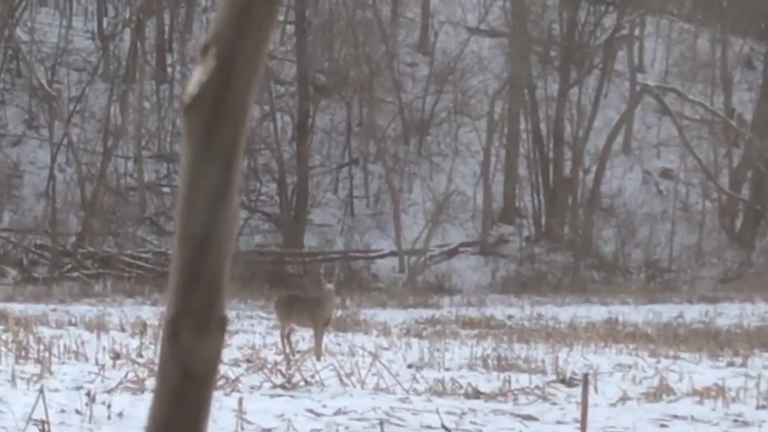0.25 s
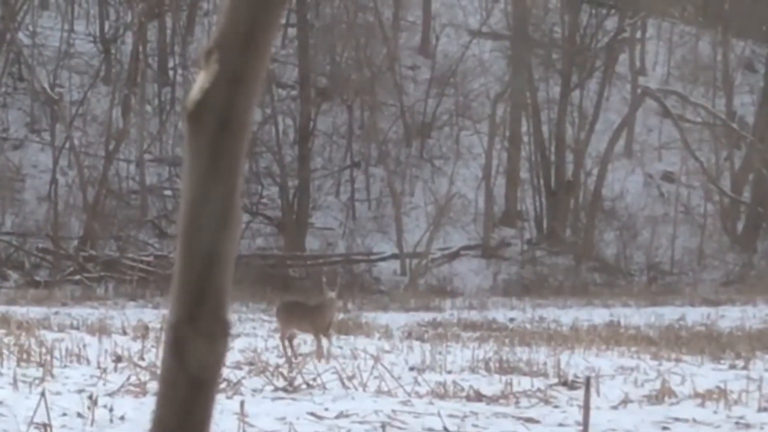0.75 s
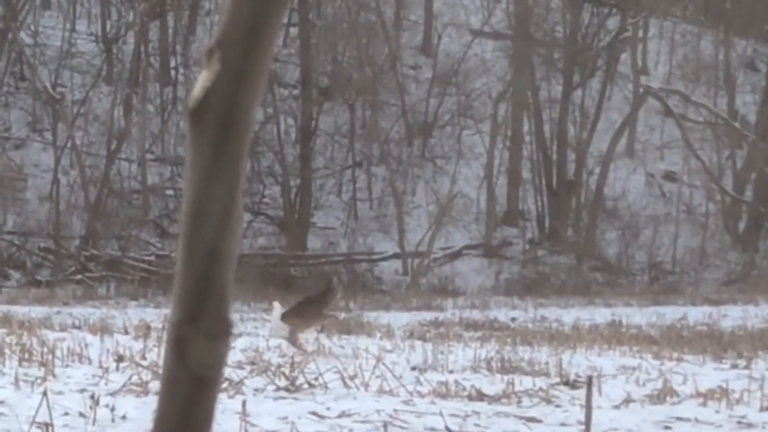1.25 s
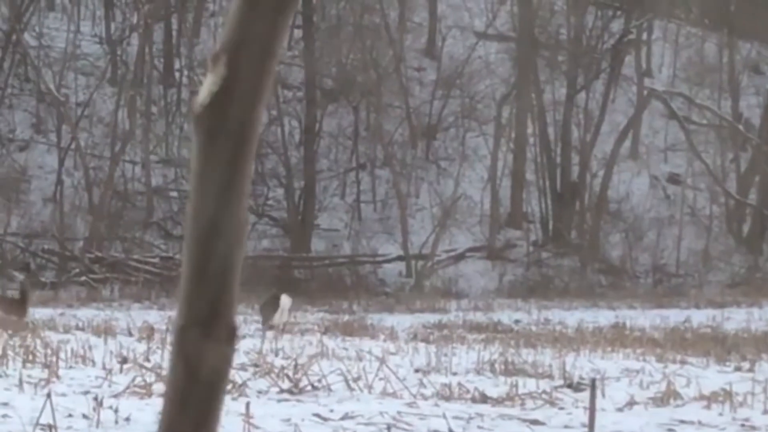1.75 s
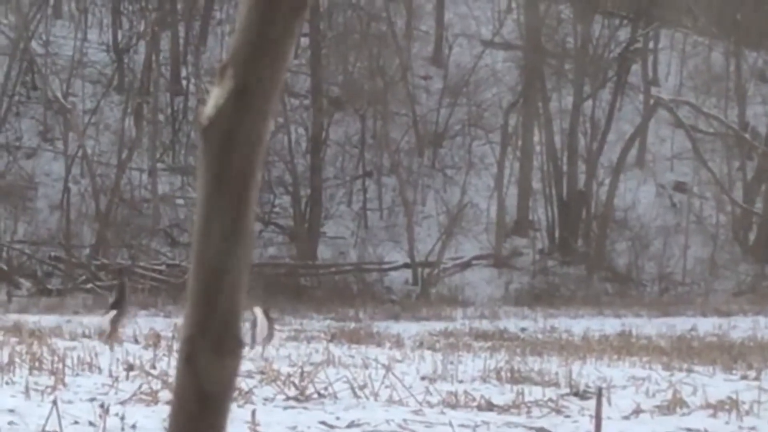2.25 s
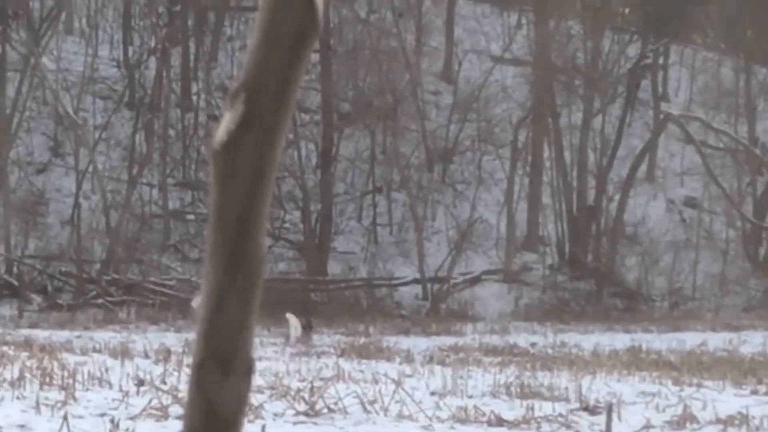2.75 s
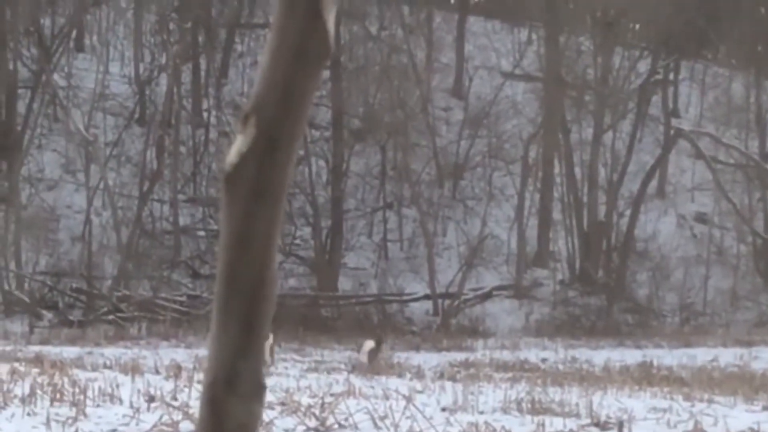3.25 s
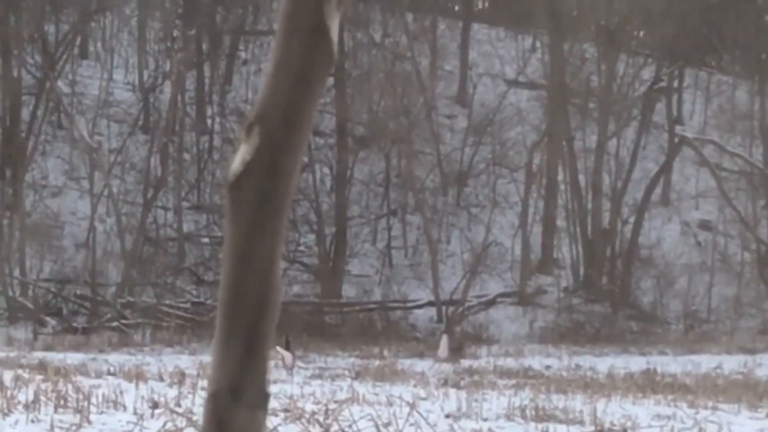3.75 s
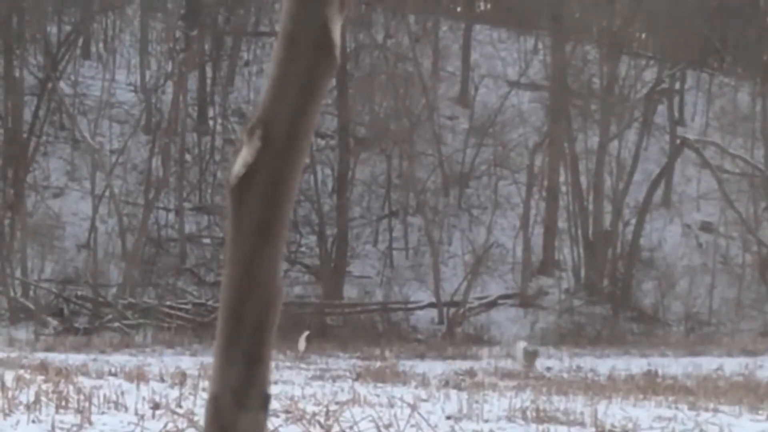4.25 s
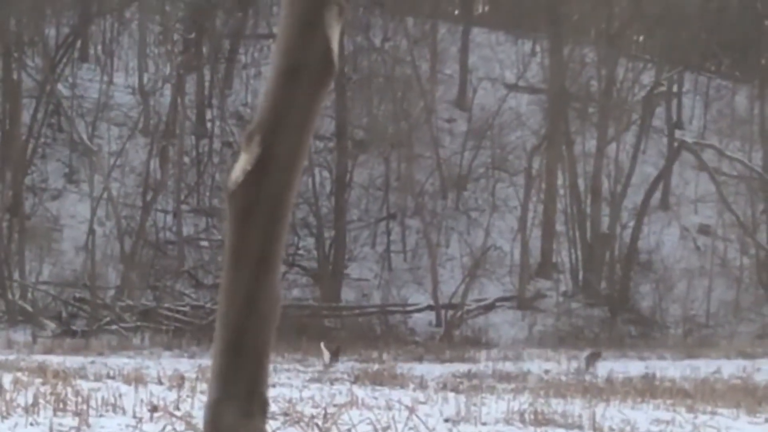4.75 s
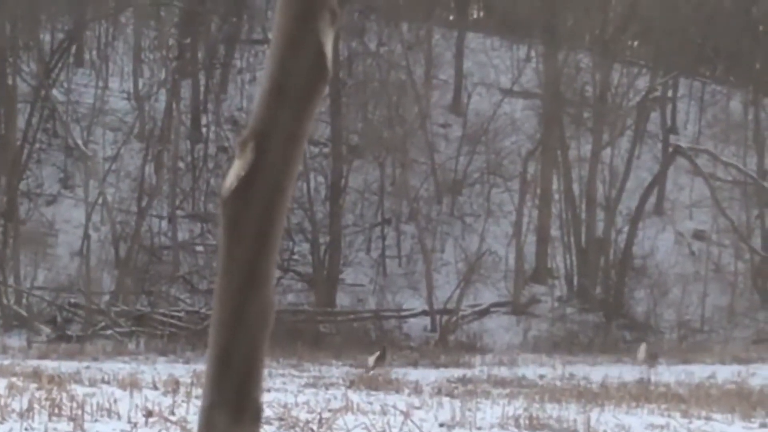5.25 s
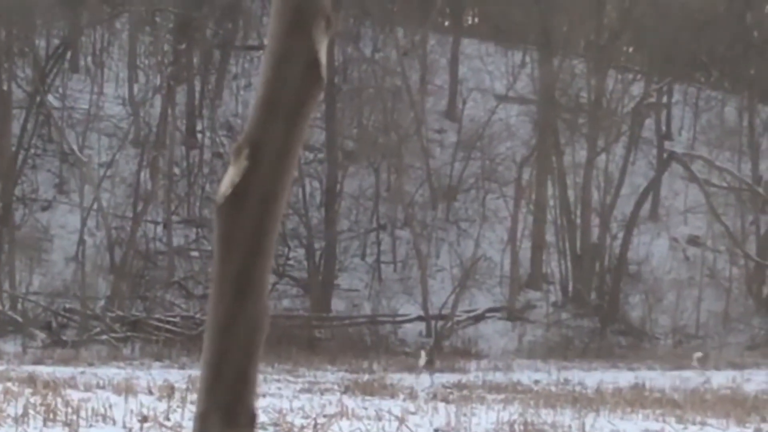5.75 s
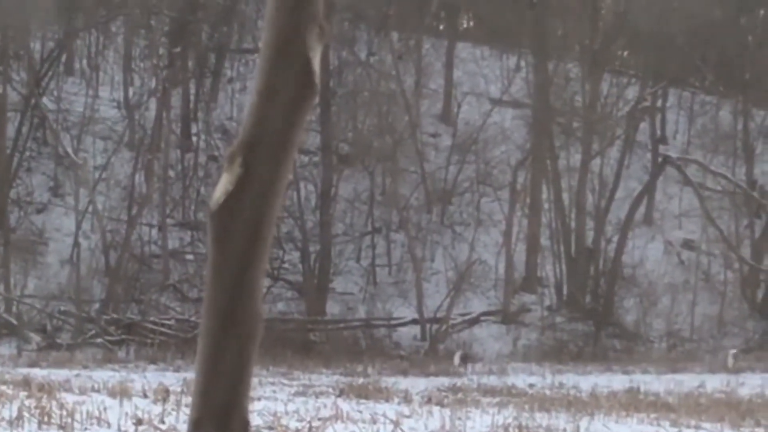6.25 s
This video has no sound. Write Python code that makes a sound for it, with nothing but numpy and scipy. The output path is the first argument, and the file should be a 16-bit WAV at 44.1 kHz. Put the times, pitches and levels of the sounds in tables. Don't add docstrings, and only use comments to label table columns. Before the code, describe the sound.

A crossbow fires very close with one violent, sharp metallic snap, then a small distant thud, faint cloth rustling, tiny ticks and low wind.

```python
import sys
import numpy as np
from scipy import signal
from scipy.fft import rfft, irfft, next_fast_len
from scipy.io import wavfile
from scipy.ndimage import map_coordinates

SR = 44100
rng = np.random.default_rng(int(sys.argv[2]) if len(sys.argv) > 2 else 0)


def master_out(mix):
    frames = np.transpose(np.atleast_2d(mix))
    ceiling = np.clip(frames, -1, 1)
    pcm = np.round(ceiling * 32767).astype(np.int16)
    wavfile.write(sys.argv[1], SR, pcm)


def natural_amplitude(level_db):
    exponent = np.asarray(level_db, float) / 20
    return 10 ** exponent


N = 287111


def unit(x):
    return x / np.sqrt(np.mean(x ** 2) + 1e-20)


def curves(rows):
    s, *cols = np.transpose(rows)
    return [np.interp(np.arange(N) / SR, s, c) for c in cols]


def wobble(rate, size=N):
    knots = rng.standard_normal(int(size * rate / SR) + 4)
    return map_coordinates(knots, [np.arange(size) * rate / SR])


def coloured(x, spectrum):
    size = next_fast_len(len(x) + 8192)
    hz, db = np.transpose(spectrum)
    bins_hz = np.fft.rfftfreq(size, 1 / SR)
    gain = natural_amplitude(np.interp(np.log(bins_hz + 1), np.log(hz + 1), db))
    return unit(irfft(rfft(x, size) * gain, size)[:len(x)])


def gritty(size, grit_db):
    return rng.standard_normal(size) * natural_amplitude(grit_db * rng.standard_normal(size))


def add(track, s, sound):
    part = track[round(s * SR):][:len(sound)]
    part += sound[:len(part)]


def burst(stage, spectrum, grit_db, chatter_db):
    s, db, rise, hold, t60 = stage
    out, t = np.zeros(N), np.arange(SR // 4) / SR
    decay_db = -60 * np.maximum(t - rise - hold, 0) / t60
    shape = np.clip(t / rise, 0, 1) ** 2 * natural_amplitude(db + decay_db)
    chatter = natural_amplitude(chatter_db * wobble(900, size=len(t)))
    add(out, s, shape * unit(chatter * coloured(gritty(len(t), grit_db), spectrum)))
    return out


def rings(rows, phase, attack):
    out, t = np.zeros(N), np.arange(SR // 5) / SR
    for s, db, hz, t60 in rows:
        tone = np.sin(2 * np.pi * hz * t + phase)
        add(out, s, natural_amplitude(db - 60 * t / t60) * tone * (1 - np.exp(-t / attack)))
    return out


def jolts(rows):
    lead_s, makeup_db = .0006, 7.5
    parts = [(s - lead_s, db + makeup_db, hz, .013 + 5 / hz) for s, db, hz in rows]
    return rings(parts, phase=0, attack=.0012)


def swells(rows, floor_db):
    edge_db, squareness = 9, 2.2
    t = np.arange(0, N / SR + .002, .001)
    power = sum(natural_amplitude(db - edge_db * np.abs((t - s) / half) ** squareness) ** 2 for s, half, db in rows)
    return 10 * np.log10(np.interp(np.arange(N) / SR, t, power) + natural_amplitude(floor_db) ** 2)


# start in seconds, level in dB, rise, hold and t60 in seconds.
TRIGGER = [
    (.412, -53, .006, .008, .02),
    (.4243, -45, .001, .013, .02),
]
# frequency in Hz, level in dB per Hz.
TRIGGER_TONE = [(120, -41), (200, -11), (1620, -7), (2250, -17), (2960, -1), (3820, -12), (15500, -16)]


def trigger():
    return sum(burst(stage, TRIGGER_TONE, grit_db=5, chatter_db=2.5) for stage in TRIGGER)


# start in seconds, level in dB, rise, hold and t60 in seconds.
RELEASE = (.4368, -11, .0025, .0078, .012)
SLAM = (.4476, -12.6, .002, .0185, .02)
SHUDDER = (.466, -18, .004, .002, .085)
# frequency in Hz, level in dB per Hz.
RELEASE_TONE = [(210, -37), (350, -7), (611, -10), (1400, -4), (2300, -11), (3310, 0), (4780, -5),
                (6070, -1), (7590, -10), (8620, -6), (11900, -8), (13500, -4), (15800, -13)]
SLAM_TONE = [(240, -39), (400, -6), (1230, -4), (1520, -5), (1810, 1), (2070, -7), (3140, -4), (3610, -6),
             (6090, -9), (6570, -6), (7670, -11), (9220, -9), (15800, -11)]
SHUDDER_TONE = [(180, -28), (300, 2), (643, -8), (785, 0), (911, -14), (1310, -3), (1770, -13), (1920, -6),
                (5940, -10), (6450, -2), (7370, -13), (15800, -13)]
# start in seconds, peak in dB, frequency in Hz, t60 in seconds.
KICKS = [
    (.4415, -11.5, 215, .045),
    (.4405, -26, 92, .08),
    (.452, -16, 168, .07),
    (.466, -37, 66, .12),
]
# time in seconds, peak in dB, frequency in Hz.
BOW_JOLTS = [(.4384, -12, 5470), (.439, -14, 8350), (.439, -12, 6200), (.4385, -16, 1100),
             (.4404, -11, 4130), (.4408, -6.5, 3360), (.4428, -15, 1330), (.4439, -15, 10080),
             (.4443, -7.5, 5990), (.4459, -16, 9130), (.4471, -14, 3870), (.4497, -12, 1160),
             (.4502, -14, 6500), (.4509, -9, 2930), (.4537, -17, 5770), (.4555, -13, 860),
             (.4557, -16, 4520), (.4571, -14, 9090), (.4575, -15, 5210), (.4577, -11, 2930),
             (.4585, -14, 1500), (.4589, -15, 6630), (.4604, -9, 1810), (.4616, -12, 2670),
             (.4618, -12, 3270), (.4636, -15, 690), (.4647, -16, 4440), (.4647, -14, 3100),
             (.4662, -15, 9170), (.4678, -14, 2330), (.4713, -22, 9170), (.4684, -17, 4480),
             (.4733, -22, 820), (.4738, -23, 2840), (.4747, -22, 6550), (.4753, -22, 4480),
             (.4778, -26, 1510), (.48, -24, 6590), (.4887, -31, 1290), (.4889, -30, 4480),
             (.4934, -32, 2710)]


def shot():
    out = burst(RELEASE, RELEASE_TONE, grit_db=3, chatter_db=1.1)
    out += burst(SLAM, SLAM_TONE, grit_db=3, chatter_db=1.8)
    out += burst(SHUDDER, SHUDDER_TONE, grit_db=2.5, chatter_db=1.5)
    return out + rings(KICKS, phase=3.6, attack=.003) + jolts(BOW_JOLTS)


# frequency in Hz, level in dB, t60 in seconds.
LIMBS = [(208, -48, .25), (246, -52, .7), (372, -41, .16), (515, -36, .14), (735, -40, .1),
         (1295, -37, .16), (1783, -51, .6), (2243, -49, .25), (2860, -43, .27), (4340, -44, .1),
         (4504, -30, .13), (6562, -30, .085), (9243, -45, .11), (10110, -50, .1)]
# frequency in Hz, level in dB, t60 in seconds.
RAIL = [
    (926, -50, .27),
    (3515, -56, .27),
    (3725, -52, .21),
    (5319, -48, .14),
    (5825, -58, .28),
    (6885, -46, .11),
]


def bow_ring():
    out, t = np.zeros(N), np.arange(SR // 2) / SR
    ring = np.zeros(len(t))
    for hz, db, t60 in LIMBS + RAIL:
        wander = .55 * wobble(55, size=len(t))
        ring += natural_amplitude(db - 60 * t / t60) * np.sin(2 * np.pi * hz * t + wander)
    add(out, .468, natural_amplitude(1.5) * ring * (1 - np.exp(-t / .002)))
    return out


# start in seconds, level in dB, rise, hold and t60 in seconds.
FIELD = (.47, -46.5, .01, .03, .3)
# frequency in Hz, level in dB per Hz.
FIELD_TONE = [(180, -40), (300, -10), (1520, -11), (1770, -1), (2050, -11), (2910, -7), (3320, -17),
              (4410, -12), (7490, -21), (15800, -18)]


def field():
    return burst(FIELD, FIELD_TONE, grit_db=.1, chatter_db=.6)


# start in seconds, level in dB, rise, hold and t60 in seconds.
STALK = [
    (.6668, -42, .001, .0055, .016),
    (.673, -50, .002, .013, .04),
]
# frequency in Hz, level in dB per Hz.
STALK_TONE = [(380, -42), (650, -14), (1250, -8), (1570, -12), (1890, -3), (2750, -12), (3140, -5),
              (5880, -2), (7090, -11), (9770, -6), (12800, -12), (14800, -9), (15800, -17)]
# time in seconds, peak in dB, frequency in Hz.
SPLINTERS = [(.6684, -42, 6030), (.669, -40, 4910), (.6699, -44, 14400), (.6702, -41, 9690),
             (.6704, -44, 3960), (.6711, -45, 11930), (.6719, -44, 3190), (.6731, -42, 5940),
             (.6788, -48, 1850), (.6829, -51, 5770)]


def stalk():
    return sum(burst(stage, STALK_TONE, grit_db=4, chatter_db=2.4) for stage in STALK) + jolts(SPLINTERS)


# start in seconds, level in dB, rise, hold and t60 in seconds.
STRIKE = [
    (.8912, -36.5, .0005, .0015, .008),
    (.893, -51, .001, .004, .11),
]
# frequency in Hz, level in dB per Hz.
STRIKE_TONE = [(290, -48), (500, -18), (1060, 0), (1840, -6), (2670, -20), (3180, -4), (3830, -2),
               (4500, -4), (5050, -14), (7350, -8), (10700, -19), (14500, -17), (15800, -22)]
# start in seconds, peak in dB, frequency in Hz, t60 in seconds.
LANDING = [(.8897, -36, 8300, .004), (.8912, -25, 6900, .005), (.8919, -22.5, 3800, .005),
           (.8926, -38, 2300, .012), (.892, -35, 1200, .012), (.8918, -30, 4500, .006),
           (.8914, -31, 6050, .009), (.891, -38, 13700, .004), (.8912, -40, 11900, .004),
           (.8912, -40, 14800, .004), (.8925, -43, 1800, .02), (.8945, -41, 190, .04)]
# start in seconds, peak in dB, frequency in Hz, t60 in seconds.
THUDS = [
    (.8935, -31, 106, .075),
    (1.0595, -43, 160, .05),
    (1.1325, -42, 115, .09),
    (1.438, -46, 120, .05),
    (5.158, -42, 130, .05),
]


def landing():
    crack = sum(burst(stage, STRIKE_TONE, grit_db=1.5, chatter_db=.8) for stage in STRIKE)
    return crack + rings(LANDING, phase=0, attack=.0004) + rings(THUDS[:1], phase=2.3, attack=.002)


# time in seconds, peak in dB, frequency in Hz.
TICKS = [(.3532, -46, 1940), (1.1194, -45, 7150), (1.4402, -41, 3570), (1.8082, -34, 3500),
         (1.8102, -40, 2600), (1.812, -44, 3000), (1.9363, -44, 6030), (2.0134, -43, 1890),
         (2.0791, -41, 4130), (2.295, -42, 4130), (2.3355, -41, 2800), (2.3591, -35.5, 4220),
         (2.406, -36.5, 3790), (2.4626, -42, 4820), (2.5087, -43, 4820), (2.9124, -39, 3570),
         (2.9815, -44, 3830), (3.1726, -46, 4260), (3.2041, -44, 3570), (3.2328, -43, 5080),
         (3.4524, -36, 5430), (3.5951, -46, 5120), (3.6984, -45, 4130), (3.847, -41, 5430),
         (3.8596, -40, 5300), (3.9305, -42, 2150), (4.0975, -46, 4480), (4.469, -42, 4950),
         (4.7818, -45, 5080), (5.4371, -44, 5080), (5.4498, -44, 5900), (6.3601, -44, 6460)]
# time in seconds, peak in dB.
SEAM = [(1.9007, -46), (2.3138, -40), (2.3798, -40), (2.7238, -39), (3.3444, -45), (3.5712, -43),
        (3.6754, -38), (3.7736, -45), (4.845, -47), (4.94, -47), (5.4636, -45), (6.315, -42)]
# time in seconds, peak in dB, frequency in Hz.
MORE_SNAPS = [(0.9544, -48, 3760), (1.7644, -52, 3600), (1.9504, -47, 3170), (1.9764, -49, 4120),
              (2.0507, -45, 4330), (2.1004, -46, 5070), (2.1124, -47, 5040), (2.2792, -42, 3790),
              (2.4244, -46, 3880), (2.5384, -44, 4630), (2.5494, -43, 4690), (2.5814, -45, 4700),
              (2.6144, -45, 5830), (2.6813, -47, 5200), (2.7072, -40, 6260), (2.7586, -45, 3650),
              (2.8833, -43, 4530), (3.0304, -50, 4710), (3.4584, -49, 3130), (3.5524, -43, 4430),
              (3.6184, -49, 3820), (3.6654, -42, 6330), (3.8112, -48, 5250), (3.8945, -48, 5000),
              (3.918, -43, 6180), (4.2804, -47, 3440), (4.3116, -48, 5260), (4.5814, -49, 3840),
              (4.6784, -49, 4380), (4.7544, -50, 5560), (4.7735, -45, 5310), (5.0539, -44, 3030),
              (5.1487, -50, 5350), (5.9834, -47, 9590), (5.9914, -47, 5530), (6.0084, -48, 12400),
              (6.0282, -46, 4100), (6.106, -45, 11000), (6.1324, -49, 5870), (6.1873, -46, 9340),
              (6.2504, -48, 11300), (6.2684, -49, 11800), (6.3794, -47, 6360), (6.4154, -52, 5720),
              (6.4484, -48, 6160)]


def ticks():
    out, t = np.zeros(N), np.arange(1024) / SR
    seam_hz = 12200
    snaps = TICKS + [(s, db, seam_hz) for s, db in SEAM] + list(MORE_SNAPS)
    for s, db, hz in snaps:
        t60 = max(.0034 + .00045 * (db + 43), .0018)
        bump = [(hz / 1.5, 0), (hz, 2.5), (hz * 1.25, 0)]
        treble_db = 6 * np.log2(hz / 4000) - 5
        slope = [(300, -24), (1200, -5), (3000, 0), (11000, treble_db)]
        spike = natural_amplitude(-60 * t / (1.2 * t60))
        after_crackle = natural_amplitude(-22 - 60 * t / .03)
        shape = (1 - np.exp(-t / .00015)) * (spike + after_crackle)
        snap = shape * coloured(coloured(rng.standard_normal(len(t)), bump), slope)
        add(out, s, natural_amplitude(db + .6) * snap / np.abs(snap).max())
    return out


# start in seconds, peak in dB, frequency in Hz, t60 in seconds.
CREAKS = [(2.0128, -44, 1700, .018), (3.481, -49, 3200, .025), (4.205, -60, 1980, .05),
          (5.227, -54, 1320, .035), (1.135, -55, 5600, .012), (1.268, -55, 900, .015),
          (3.918, -54, 5500, .012), (4.03, -62, 2100, .04), (5.342, -52, 4250, .015)]


def creaks_and_knocks():
    return rings(CREAKS, phase=0, attack=.002) + rings(THUDS[1:], phase=.3, attack=.003)


def crackle():
    per_s, level_db, spread_db, t60 = 85, 7, 2, .002
    t = np.arange(128) / SR
    chance = rng.random((int(per_s * N / SR), 4))
    when, size, octave, phase = chance.T[..., None]
    carrier = np.sin(2 * np.pi * (3000 * 2 ** (2.2 * octave) * t + phase))
    spikes = (carrier + .6 * rng.standard_normal(carrier.shape)) * natural_amplitude(-60 * t / t60)
    spikes = spikes * natural_amplitude(level_db - spread_db * np.log(size + .01))
    where = (when * N).astype(int) + np.arange(len(t))
    return np.bincount(where.ravel(), spikes.ravel(), N + len(t))[:N]


# frequency in Hz, level in dB per Hz.
CLOTH = [(180, -31), (300, -1), (759, -5), (1740, -5), (2820, -7), (4480, -6), (4950, -7), (5470, -6),
         (7620, -10), (9450, -9), (10400, -12), (12500, -9), (15000, -13), (15800, -16)]
# frequency in Hz,
# gain in dB.
PORT = [(7000, .5), (7800, -1.5), (8800, 1), (9800, 1), (10500, -1.2), (11400, 1.2), (14500, 1.2),
        (15800, 3)]
# time in seconds, pressure in dB.
CONTACT = [(0, -77), (.42, -76), (.62, -66), (.72, -64), (.92, -66), (1.03, -72), (1.2, -75), (1.72, -74),
           (2.2, -71), (2.4, -65), (2.85, -64), (3.03, -71), (3.75, -72), (4.0, -76), (4.2, -72),
           (5.62, -75), (6.51, -72)]
# middle in seconds, half length in seconds, level in dB.
STROKES = [(.235, .035, -72), (.34, .035, -67), (1.385, .05, -70), (1.59, .075, -67), (1.79, .06, -66),
           (1.95, .05, -65), (2.01, .03, -64), (2.078, .045, -60), (2.33, .09, -63), (2.475, .05, -60.5),
           (2.575, .05, -60), (2.72, .03, -62), (2.925, .06, -59), (3.09, .065, -61.5), (3.232, .045, -62),
           (3.5, .05, -63), (3.575, .035, -64), (3.852, .035, -61), (3.925, .025, -66), (4.115, .03, -66),
           (4.205, .04, -67), (4.385, .06, -61), (4.492, .025, -63), (4.795, .045, -62), (5.065, .03, -62),
           (5.455, .04, -67), (5.81, .07, -70), (5.96, .03, -68), (6.045, .04, -64), (6.12, .035, -64),
           (6.215, .04, -65), (6.36, .045, -66), (6.28, .035, -70), (3.62, .015, -68)]
# middle in seconds, level in dB.
FLICKS = [(1.052, -68), (1.125, -61), (1.272, -70), (2.235, -66), (3.34, -68), (3.457, -60), (3.674, -61),
          (4.6, -69), (4.69, -66), (5.158, -69), (5.24, -70), (5.335, -69), (6.45, -69)]
# time in seconds, level in dB.
AFTERWASH = [(.45, -100), (.5, -66), (.93, -65), (1.05, -69), (1.3, -71), (1.6, -71), (2.2, -70),
             (2.95, -72), (3.02, -79), (4.1, -79), (4.4, -76), (6.51, -79)]
# middle in seconds, half length in seconds, level in dB.
SCUFFS = [(.98, .03, -66), (1.018, .012, -65), (1.053, .012, -62), (1.085, .012, -65), (1.124, .008, -62),
          (1.149, .01, -58), (1.18, .02, -66), (1.269, .007, -60), (1.99, .01, -62), (2.015, .006, -58),
          (2.075, .012, -58), (2.8, .01, -63), (3.32, .008, -66), (3.84, .008, -67), (4.585, .012, -65),
          (6.03, .008, -67), (6.062, .012, -66), (6.345, .015, -66)]


def rustle():
    drag_db = swells(STROKES, curves(CONTACT)[0])
    flick_half_s = .016
    crisp_db = swells([(s, flick_half_s, db) for s, db in FLICKS], drag_db)

    brush_db = -68.5 + .62 * (drag_db + 66)
    brush_db = 10 * np.log10(natural_amplitude(brush_db) ** 2 + natural_amplitude(curves(AFTERWASH)[0]) ** 2)
    brush_db = swells(SCUFFS, brush_db)

    flutter_db = 1.1 * wobble(40) + 1.4 * wobble(150)
    pops = 14 * (rng.random(N) < 160 / SR) * rng.uniform(-1, 1, N)
    top = coloured(pops + gritty(N, grit_db=4), CLOTH)
    top = coloured(top, [(1200, -30), (2200, -9), (3600, 0)] + PORT)
    low = coloured(gritty(N, grit_db=3), CLOTH)
    low = coloured(low, [(500, -1.5), (2200, 0), (3600, -7), (7000, -30)])
    crisp = natural_amplitude(crisp_db + .4) * (unit(natural_amplitude(flutter_db) * top) + crackle())
    brush = natural_amplitude(brush_db - .2) * unit(natural_amplitude(.7 * flutter_db) * low)
    return crisp + brush


# time in seconds, strength in dB.
WIND = [(0.0, -69), (0.52, -66), (0.78, -68), (1.03, -64), (1.38, -67), (1.49, -64), (1.92, -66),
        (2.48, -61), (3.1, -61), (3.3, -65), (3.62, -68), (4.04, -65), (5.24, -65), (5.77, -68),
        (6.11, -65), (6.51, -66)]
# middle in seconds, level in dB.
GUSTS = [(1.42, -63), (1.7, -62), (2.06, -62), (2.38, -59), (2.73, -58), (2.92, -59), (3.24, -60),
         (3.1, -60), (3.66, -63), (3.9, -62), (4.1, -63), (4.34, -60), (4.5, -61), (4.8, -61), (5.3, -62),
         (5.51, -59), (6.04, -58), (6.23, -58), (6.4, -62)]
# middle in seconds, level in dB.
SLAPS = [(.33, -65), (.8, -66), (1.06, -62), (1.145, -62), (1.267, -65), (1.445, -62), (1.525, -64),
         (1.8, -65), (2.0, -62), (2.08, -63), (2.375, -65), (2.45, -64), (2.714, -61), (2.92, -62),
         (3.085, -65), (3.5, -64), (3.93, -64), (4.6, -66), (4.78, -66), (5.164, -62)]
# frequency in Hz, level in dB.
RUMBLE = [(12, -46), (20, -16), (34, -5), (54, 0), (108, -2), (130, -6), (170, -36), (290, -120)]
FLAP = [(85, -30), (130, -1), (185, 0), (250, -5), (310, -13), (430, -40)]


def wind():
    strength_db = curves(WIND)[0]
    gust_half_s, slap_half_s = .06, .035
    breeze_db = strength_db + 1.1 + .8 * wobble(6)
    rumble_db = swells([(s, gust_half_s, db) for s, db in GUSTS], breeze_db)
    calm_db = -69.5 + .3 * (strength_db - strength_db.mean())
    flap_db = swells([(s, slap_half_s, db) for s, db in SLAPS], calm_db)
    rumble = unit(natural_amplitude(1.2 * wobble(18)) * coloured(rng.standard_normal(N), RUMBLE))
    flap = unit(natural_amplitude(1.8 * wobble(30)) * coloured(rng.standard_normal(N), FLAP))
    return natural_amplitude(rumble_db + .2) * rumble + natural_amplitude(flap_db - .8) * flap


# time in seconds, level in dB.
HUM = [
    (0, -97),
    (3.9, -94),
    (4.2, -77),
    (4.75, -79),
    (5, -84),
    (6, -88),
    (6.51, -92),
]


def gap_hum():
    whistle = coloured(rng.standard_normal(N), [(1760, -40), (1870, 0), (1980, -40)])
    return natural_amplitude(curves(HUM)[0]) * whistle


def scene():
    bow = trigger() + shot() + bow_ring() + field()
    bolt = stalk() + landing()
    clothing = ticks() + creaks_and_knocks() + rustle()
    return (bow + bolt + clothing + wind() + gap_hum())[None]


def roll_off(x):
    return signal.sosfilt(signal.butter(12, 16860, fs=SR, output="sos"), x)


def record(dry):
    rounded = dry / (1 + np.abs(dry / .97) ** 5) ** (1 / 5)
    size = next_fast_len(N)
    edge = np.clip((16000 - np.fft.rfftfreq(size, 1 / SR)) / 350, 0, 1)
    limited = irfft(rfft(rounded, size) * np.sin(edge * np.pi / 2) ** 2, size)[:, :N]
    return roll_off(limited)


dry = scene()
out = record(dry)
master_out(out)
```